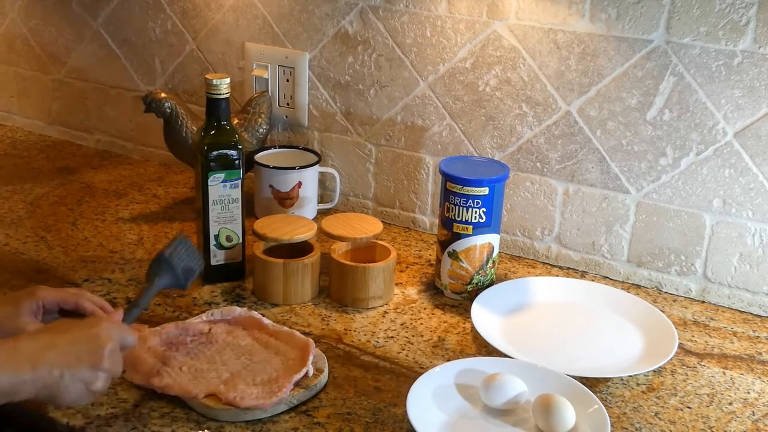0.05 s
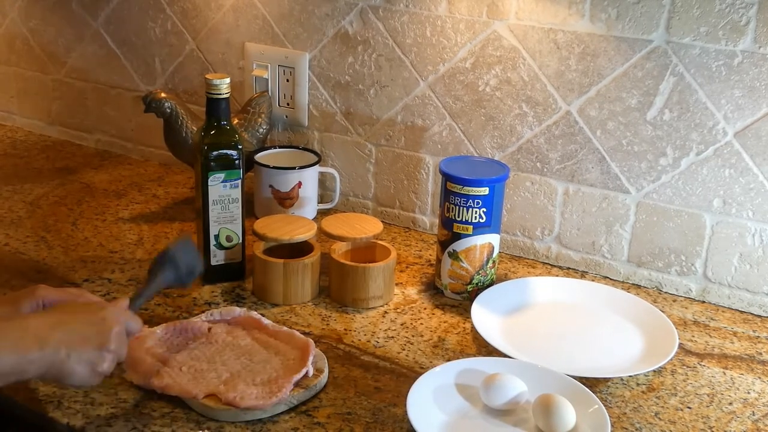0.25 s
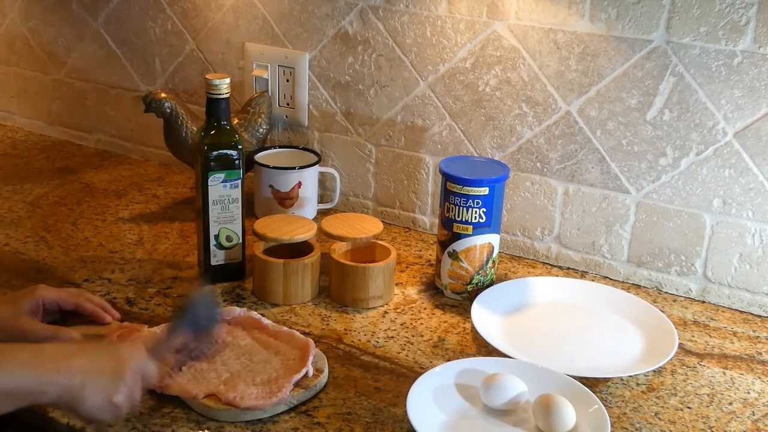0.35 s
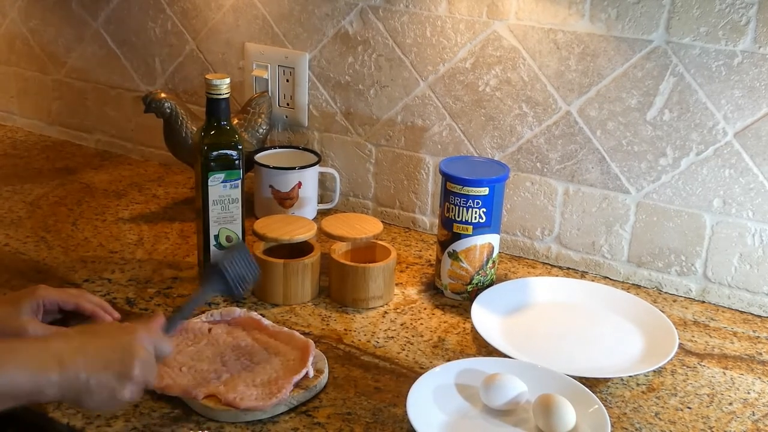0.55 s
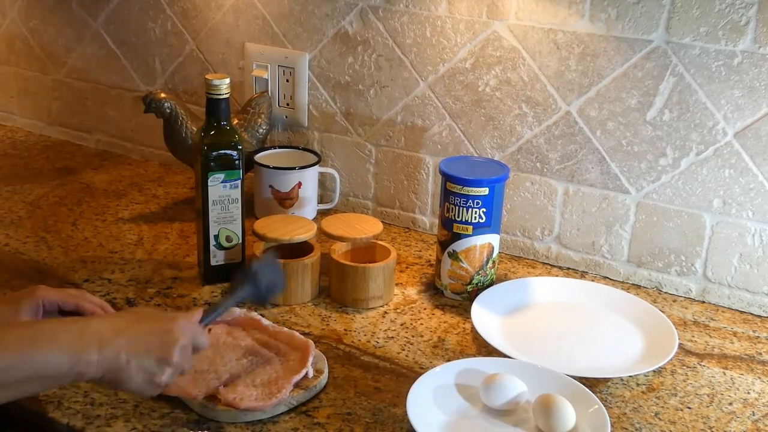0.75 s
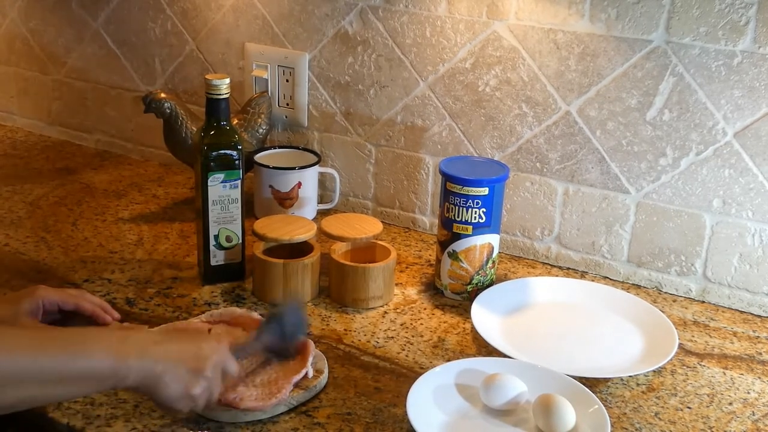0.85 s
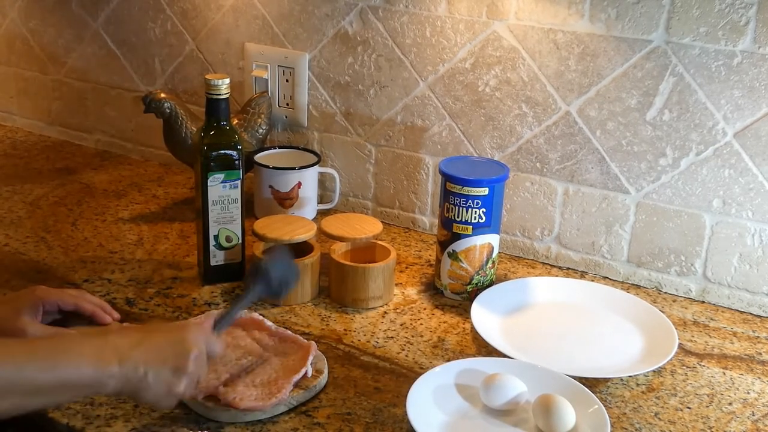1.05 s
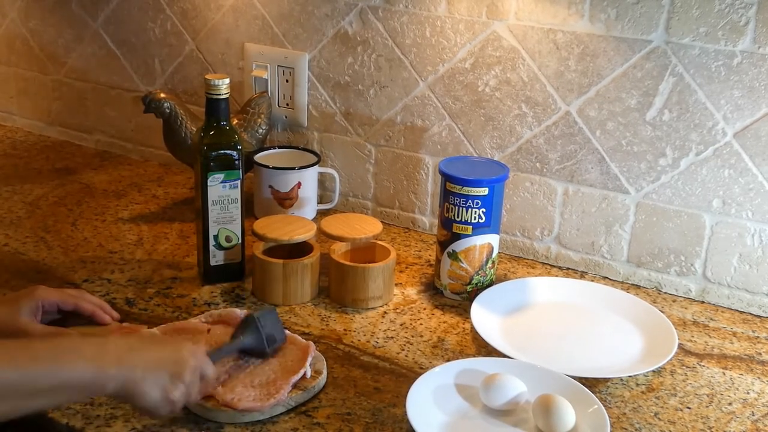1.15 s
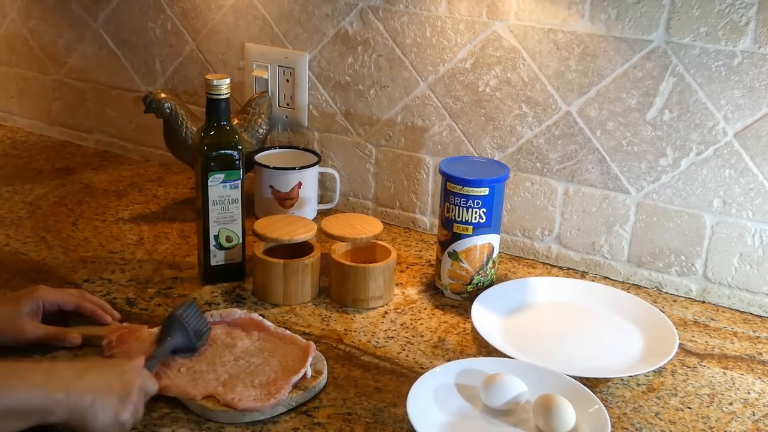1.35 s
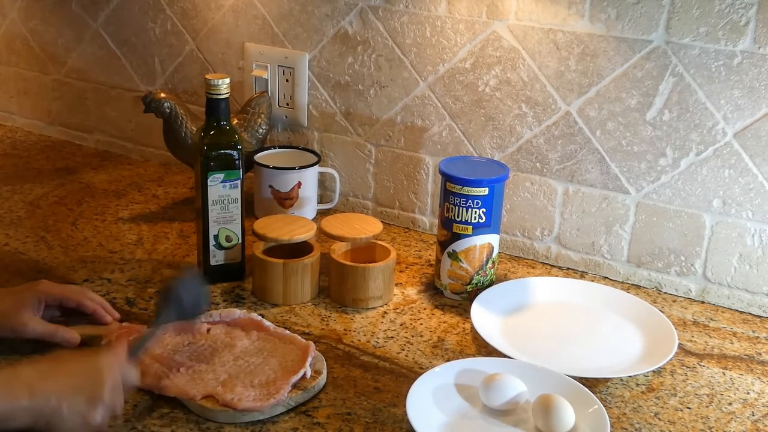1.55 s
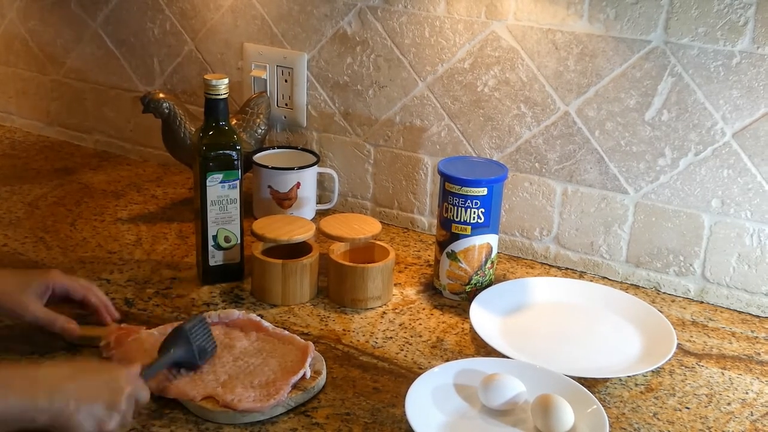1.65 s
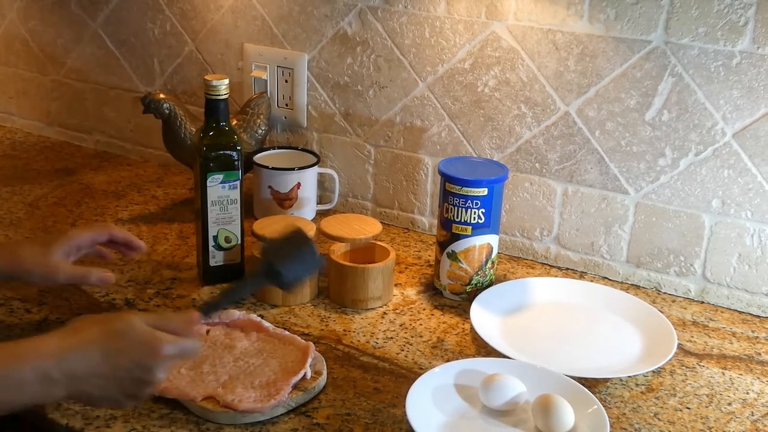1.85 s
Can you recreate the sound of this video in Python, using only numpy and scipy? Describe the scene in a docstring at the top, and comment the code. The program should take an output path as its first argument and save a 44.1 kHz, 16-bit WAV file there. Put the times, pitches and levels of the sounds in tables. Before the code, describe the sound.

A mallet pounds meat on a wooden board, about four heavy, wet slaps a second, with woody knocks and occasional board clacks on the stone counter, closely heard in a bright, reverberant tiled kitchen.

```python
"""In a hard tiled kitchen a mallet pounds a slice of meat on a wooden board, about four blows a second.
Each blow is a delayed-bass impulse coloured by trapped-air resonances, with a noisy spray of juice.
Damped modes of the board and stone counter answer; after some blows the board hops and clacks down.
Scatter, one hard reflection and a decaying noise tail form the room, over a faint low rumble.
The recorder opens during the first blow's decay, limits loud peaks and fades at the end."""
import sys
import numpy as np
from scipy import signal
from scipy.fft import rfft, irfft, next_fast_len
from scipy.io import wavfile
from scipy.ndimage import uniform_filter1d

SR = 44100
rng = np.random.default_rng(int(sys.argv[2]) if len(sys.argv) > 2 else 0)


def wav_record(signal):
    """Record a signal, one row per channel, as 16-bit PCM in the file named by sys.argv[1]."""
    frames = np.transpose(np.atleast_2d(signal))
    bounded = np.clip(frames, -1, 1)
    # unit amplitude maps onto the largest positive 16-bit level
    quanta = np.round(bounded * 32767).astype(np.int16)
    wavfile.write(sys.argv[1], SR, quanta)


N = 83790
HIT_SIZE = 32768  # samples computed for each hit

# Diffuse room decay. Each row: frequency in Hz, time to fall 60 dB in s.
ROOM_DECAY = [(100, 0.73), (400, 0.81), (1400, 0.69), (4000, 0.67), (8000, 0.55), (15000, 0.42)]
# Spectrum of the diffuse room sound. Each row: frequency in Hz, relative level in dB.
ROOM_SPECTRUM = [(80, -5.5), (200, -4), (500, 0), (900, 0.5), (1400, -1.5), (3000, -2), (6000, -4.5),
                 (10000, -5.5), (15000, -17)]
# Modes of board and counter together. Each row: frequency in Hz, relative level in dB, 60 dB decay in s.
COUNTER_MODES = [(121.2, -29.5, 0.13), (162.3, -21.5, 0.15), (223, -29.5, 0.38), (294.7, -24.5, 0.09),
                 (341, -32.5, 0.13), (477, -29.5, 0.026), (465.4, -45, 0.18), (607, -21, 0.024),
                 (680, -48, 0.017)]
# Modes of the wooden board. Each row: frequency in Hz, relative level in dB, 60 dB decay in s.
BOARD_MODES = [(990, -48, 0.12), (1202, -16, 0.033), (1324, -19.5, 0.092), (1374, -11, 0.021),
               (1732, -35.5, 0.017), (2222, -15, 0.01), (2440, -26.5, 0.068), (2746, -26.5, 0.033),
               (3974, -27.5, 0.055)]
# Landings after the board hops. Each row: start in s, relative level in dB, clack frequency in Hz.
BOARD_LANDINGS = [(0.634, -20, 1550), (1.1197, -22, 1410), (1.1365, -9.5, 2490), (1.6064, -7.5, 1470),
                  (1.6226, -6.5, 2580), (1.6284, -8, 2800)]
# Spectrum of the juice spray. Each row: frequency in Hz, relative level in dB.
SPRAY_SPECTRUM = [(1000, -29), (3000, 3), (7000, -1), (10000, -3.5), (15000, -15)]
# Basic spectrum of the slap. Each row: frequency in Hz, relative level in dB.
SLAP_SPECTRUM = [(25, -12.5), (70, -7.5), (130, -4), (300, 0), (600, -4.5), (1000, -0.5), (1500, 0),
                 (2600, -0.5), (3400, -6.5), (4800, -6), (6300, -8.5), (8500, -19), (15000, -25.5)]
# Mallet blows. Each row: start in s, slap level in dB, slap treble in dB, air crack in dB, air pop in dB,
# pop frequency in Hz, hollow boost in dB, hollow frequency in Hz, spray level in dB, board knock in dB,
# counter thud in dB (also the slap's bass shelf). All levels are relative.
MALLET_BLOWS = [(.135, -2, -7, 7, 5.5, 2670, 3.5, 395, -32, 1, -5.5),
                (.3798, 1.5, 6.5, 6.5, 9, 2140, 4.5, 646, -7, 5, -6),
                (.6260, 0.5, -9.5, 2, 8, 1500, 8, 457, 3, -16, -3.5),
                (0.8784, 3, -1.5, 8.5, 0, 1500, 5.5, 470, -6.5, -3.5, -0.5),
                (1.1114, -2, -2, -2.5, 4.5, 1870, 4, 325, -1, -2.5, -1.5),
                (1.3491, 3.5, 0, 8.5, 4.5, 2400, 6, 703, -5, 3, -7.5),
                (1.5973, -1, -3, 5.5, 9, 1328, 0.5, 330, 0, -2, -3)]

RUMBLE_DB, RUMBLE_HZ = -81, 110  # faint background of the house
# Room: levels in dB, times in s; early scatter comes from backsplash and crockery.
ROOM_DB, ROOM_GAP_S = -1, 0.003
EARLY_DB, EARLY_T60 = -3, 0.068
NEAR_DB, NEAR_T60 = -4, 0.016  # scatter from the hand, mallet and jars close by
ECHO_S, ECHO_DB, ECHO_HZ = 0.0077, -7, 5500  # delay, level before the low-pass, its corner
ROOM_SIDE_DB = -5
TREBLE_SIDE_DB, TREBLE_SIDE_HZ = -2.5, 8300  # extra side gain: the room is narrower in the treble
PAN_DB = -0.14  # left gain; the right has the opposite sign
# Board and counter: times in s.
MODE_SCATTER_DB = 0.5  # standard deviation of each mode's level
BOARD_DELAY_S, BOARD_RISE_S = 0.0015, 0.00062
CLACK_DB, CLACK_T60, CLACK_RISE_S = 2, 0.006, 0.00037
REBOUND_RING_DB = -5
# Meat and trapped air.
SPRAY_DB, SPRAY_T60 = -16.5, 0.042  # relative level, 60 dB decay in s
SPRAY_CLUMP = 0.22  # spread of the log amplitude
SLAP_DB = 21.5
SQUASH_S, SQUASH_HZ = 0.002818, 2521  # greatest bass delay; it shrinks e-fold for each such step in Hz
BASS_HZ, TREBLE_HZ = 464, 4300  # edges of the slap's shelves
CRACK_HZ = 4196  # air squeezed between the mallet's teeth
CRACK_WIDTH, POP_WIDTH, HOLLOW_WIDTH = 0.078, 0.055, 0.2  # half-widths as shares of centre frequency
# Recorder.
LIMIT_DB, RELEASE_DB_PER_S, DETECT_S = -8.5, 13.5, 0.0031
CLIP_TOP = 0.98  # full-scale amplitude
OPEN_S = 0.19646  # silence until here
FADE_S, FADE_DB_PER_S = 1.733, 31
TOP_HZ = 16200


def amp(db):
    """Level in decibels is twenty times the logarithm of amplitude."""
    return 10 ** (np.asarray(db) / 20)


def along(points, hz):
    """Interpolation of (Hz, value) points follows a logarithmic frequency axis."""
    f, v = np.transpose(points)
    return np.interp(np.log(hz + 1), np.log(f + 1), v)


def above(hz, edge_hz):
    """A smooth shelf weight rises from 0 to 1 across a frequency edge."""
    return 1 - 1 / (1 + (hz / edge_hz) ** 4)


def clock():
    return np.arange(HIT_SIZE) / SR


def filtered(x, response):
    """Linear filtering multiplies the spectrum by a complex response."""
    n = x.shape[-1]
    m = 2 * next_fast_len(n // 2 + 2048)
    hz = np.fft.rfftfreq(m, 1 / SR)
    return irfft(rfft(x, m) * response(hz), m)[..., :n]


def causal(gain):
    """Minimum phase follows from folding the cepstrum of the gain onto positive time."""
    cepstrum = irfft(np.log(gain))
    cepstrum[1:len(cepstrum) // 2] *= 2
    cepstrum[len(cepstrum) // 2 + 1:] = 0
    return np.exp(rfft(cepstrum))


def delayed(x, s):
    """A pure delay is a phase lag proportional to frequency."""
    return filtered(x, lambda hz: np.exp(-2j * np.pi * hz * s))


def rumble():
    """Low-pass filtering of stationary noise leaves a faint, steady background."""
    x = filtered(rng.standard_normal((2, N)), lambda hz: 1 - above(hz, RUMBLE_HZ))
    return amp(RUMBLE_DB) * x / x.std()


def burst(t60):
    """Dense scatter is exponentially decaying noise, here of unit energy."""
    x = rng.standard_normal(HIT_SIZE) * amp(-60 * clock() / t60)
    return x / np.linalg.norm(x)


def diffuse_tail():
    """Reverberation is noise whose decay rate depends on frequency, joined by early scatter."""
    hz, t, z = signal.stft(rng.standard_normal((2, HIT_SIZE)), SR, nperseg=256)
    decay = amp(-60 * t / along(ROOM_DECAY, hz)[:, None])
    late = signal.istft(z * decay, SR, nperseg=256)[1][:, :HIT_SIZE]
    early = np.array([burst(EARLY_T60), burst(EARLY_T60)])
    tail = amp(ROOM_DB) * late / np.linalg.norm(late[0]) + amp(EARLY_DB) * early
    return filtered(tail, lambda hz: causal(amp(along(ROOM_SPECTRUM, hz))))


def kitchen(x):
    """Superposition joins direct sound, near scatter, one reflection and a diffuse mid-side tail."""
    tail = diffuse_tail()
    mid, side = signal.fftconvolve(delayed(x, ROOM_GAP_S)[None], tail, axes=1)[:, :HIT_SIZE]
    direct = x + amp(NEAR_DB) * signal.fftconvolve(x, burst(NEAR_T60))[:HIT_SIZE]
    echo = filtered(delayed(direct, ECHO_S), lambda hz: amp(ECHO_DB) / (1 + 1j * hz / ECHO_HZ))
    mid = mid + direct + echo
    side = filtered(side, lambda hz: amp(ROOM_SIDE_DB + TREBLE_SIDE_DB * above(hz, TREBLE_SIDE_HZ)))
    return np.array([(mid + side) * amp(PAN_DB), (mid - side) * amp(-PAN_DB)])


def ping(hz, delay, t60, db, rise):
    """A damped resonance is a sinusoid with a short rise and exponential decay."""
    t = np.maximum(clock() - delay, 0)
    envelope = amp(db - 60 * t / t60) * (1 - np.exp(-t / rise))
    return envelope * np.sin(2 * np.pi * hz * t)


def ring(modes):
    """Modal superposition sums a struck body's resonances, with alternating signs in table order."""
    total = np.zeros(HIT_SIZE)
    for k, (hz, db, t60) in enumerate(modes):
        mode_db = db + MODE_SCATTER_DB * rng.standard_normal()
        total += (-1) ** k * ping(hz, BOARD_DELAY_S, t60, mode_db, BOARD_RISE_S)
    return total


def rebound(clack_hz):
    """Impact of the falling board on the counter excites a dry clack and the board's modes."""
    clack = ping(clack_hz, 0, CLACK_T60, CLACK_DB, CLACK_RISE_S)
    return amp(REBOUND_RING_DB) * ring(BOARD_MODES) + clack


def spray():
    """Juice pressed from the meat fizzes as decaying noise with random amplitude clumps."""
    log_level = np.repeat(rng.standard_normal(HIT_SIZE // 32), 32)
    clumps = np.exp(SPRAY_CLUMP * log_level - SPRAY_CLUMP ** 2)  # mean power 1
    fizz = rng.standard_normal(HIT_SIZE) * clumps * amp(SPRAY_DB - 60 * clock() / SPRAY_T60)
    return filtered(fizz, lambda hz: causal(amp(along(SPRAY_SPECTRUM, hz))))


def slap(treble_db, bass_db, cavities):
    """Dispersion delays the bass as the meat gives way; trapped air adds resonant peaks."""
    def response(hz):
        lag_cycles = SQUASH_S * SQUASH_HZ * (1 - np.exp(-hz / SQUASH_HZ))
        shelves = bass_db * (1 - above(hz, BASS_HZ)) + treble_db * above(hz, TREBLE_HZ)
        air = sum(db / (1 + ((hz / centre - 1) / width) ** 2) for centre, width, db in cavities)
        colour = causal(amp(along(SLAP_SPECTRUM, hz) + shelves + air))
        return colour * np.exp(-2j * np.pi * lag_cycles)

    return amp(SLAP_DB) * filtered(signal.unit_impulse(HIT_SIZE), response)


def blow(slap_db, treble_db, crack_db, pop_db, pop_hz, hollow_db, hollow_hz, spray_db, knock_db, thud_db):
    """Impact excites air in the teeth, in the meat and under the slice, then the wood and counter."""
    cavities = [(CRACK_HZ, CRACK_WIDTH, crack_db),
                (pop_hz, POP_WIDTH, pop_db),
                (hollow_hz, HOLLOW_WIDTH, hollow_db)]
    meat = amp(slap_db) * slap(treble_db, thud_db, cavities) + amp(spray_db) * spray()
    knock = amp(knock_db) * ring(BOARD_MODES)
    thud = amp(thud_db) * ring(COUNTER_MODES)
    return meat + knock + thud


def scene():
    """Linear superposition adds every hit, with its own room response, to the background."""
    hits = [(s, blow(*strengths)) for s, *strengths in MALLET_BLOWS]
    hits += [(s, amp(db) * rebound(hz)) for s, db, hz in BOARD_LANDINGS]
    mix = rumble()
    for s, x in hits:
        mix += np.pad(kitchen(x), ((0, 0), (round(s * SR), N)))[:, :N]
    return mix


def record(dry):
    """Gain control limits power with a slow release; soft clipping, gating, a fade and a low-pass follow."""
    t = np.arange(N) / SR
    power = np.abs(uniform_filter1d(np.mean(dry ** 2, axis=0), max(2, round(DETECT_S * SR))))
    over_db = np.maximum(10 * np.log10(power + 1e-12) - LIMIT_DB, 0)
    # A running maximum on a rising ramp holds each peak and releases it at a constant dB rate.
    release_db = RELEASE_DB_PER_S * t
    x = dry * amp(release_db - np.maximum.accumulate(over_db + release_db))
    x = x / (1 + (x / CLIP_TOP) ** 16) ** (1 / 16)
    x = x * (t > OPEN_S) * amp(-FADE_DB_PER_S * np.maximum(t - FADE_S, 0))
    return filtered(x, lambda hz: 1 / np.sqrt(1 + (hz / TOP_HZ) ** 120))


dry = scene()
out = record(dry)
wav_record(out)
```